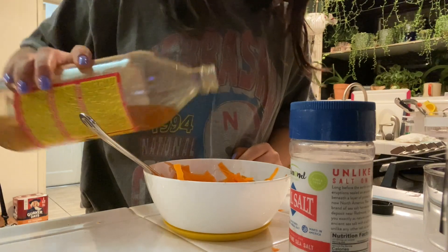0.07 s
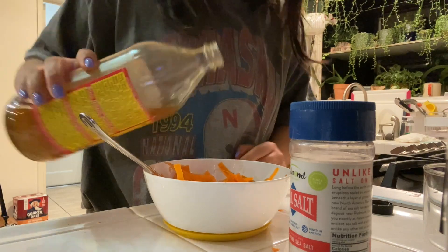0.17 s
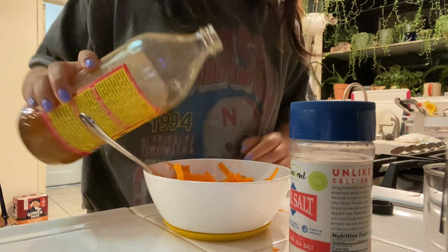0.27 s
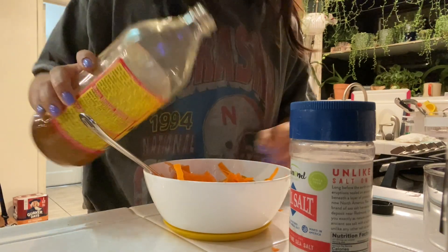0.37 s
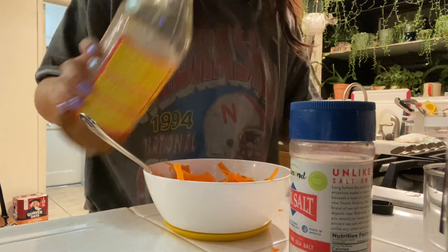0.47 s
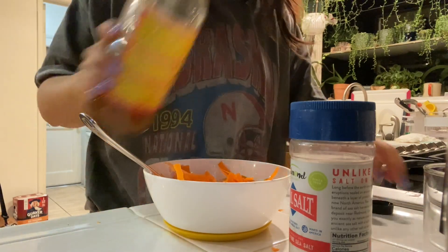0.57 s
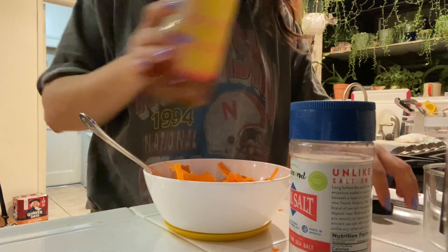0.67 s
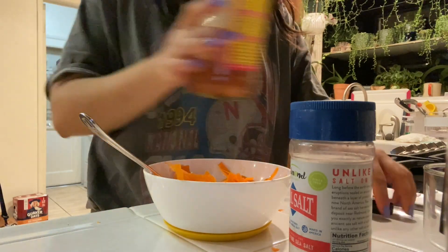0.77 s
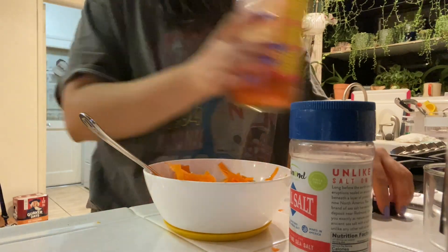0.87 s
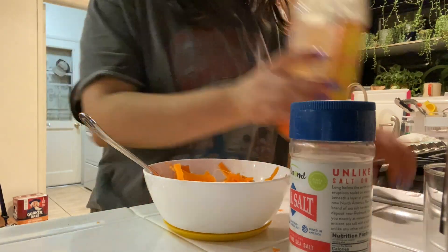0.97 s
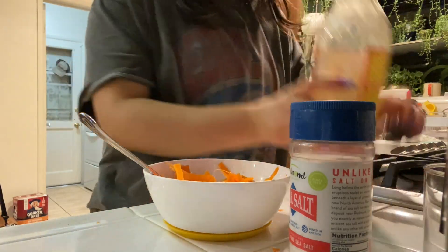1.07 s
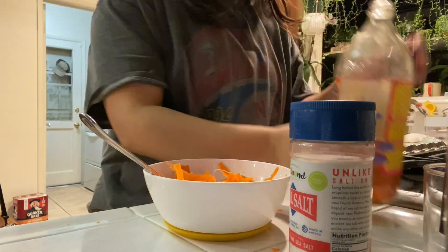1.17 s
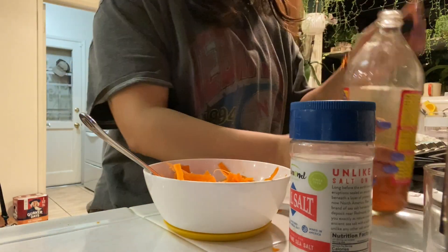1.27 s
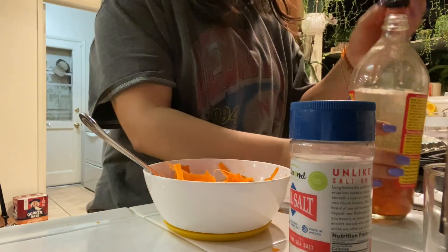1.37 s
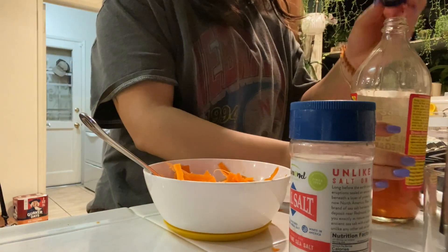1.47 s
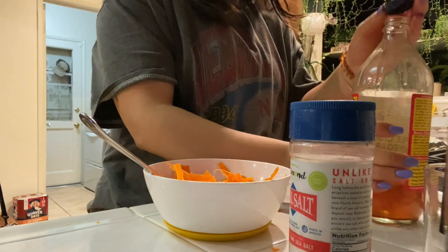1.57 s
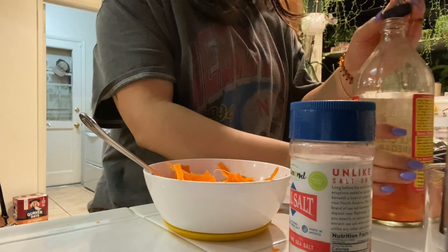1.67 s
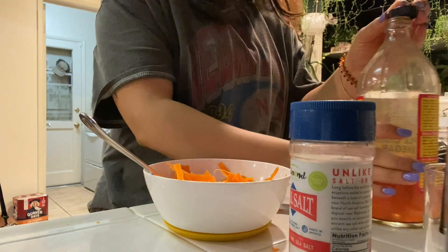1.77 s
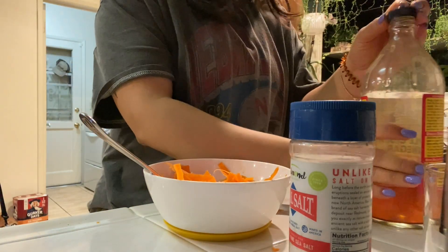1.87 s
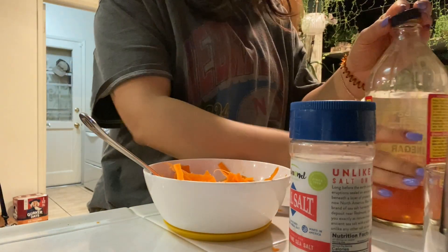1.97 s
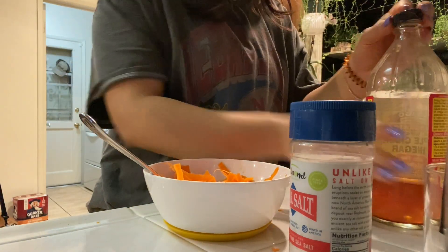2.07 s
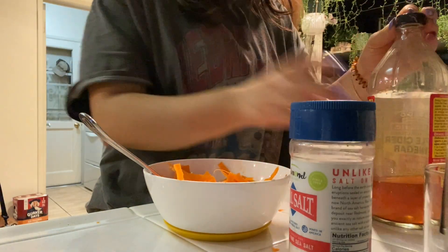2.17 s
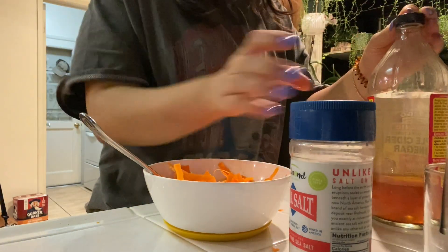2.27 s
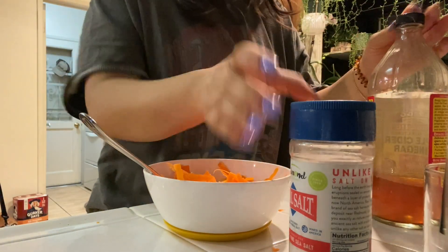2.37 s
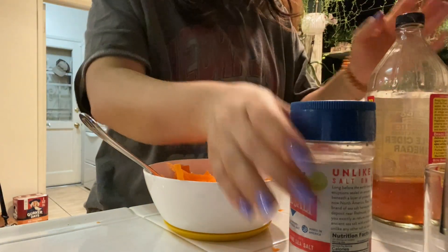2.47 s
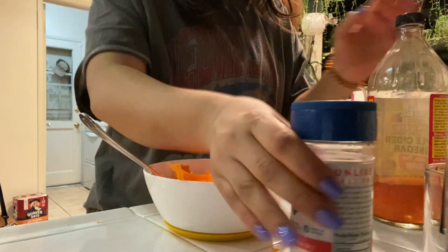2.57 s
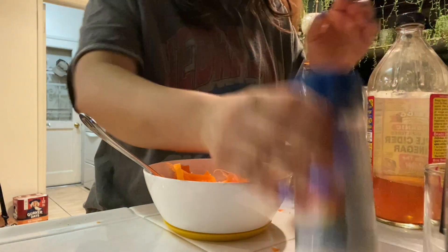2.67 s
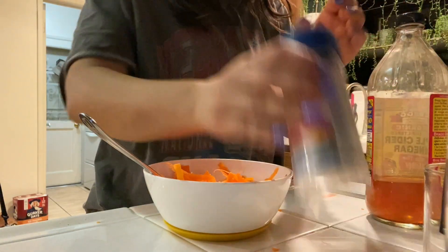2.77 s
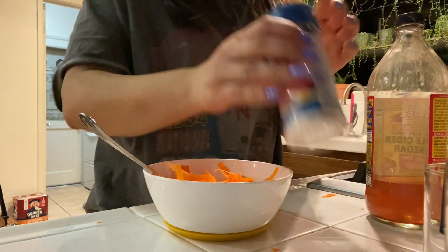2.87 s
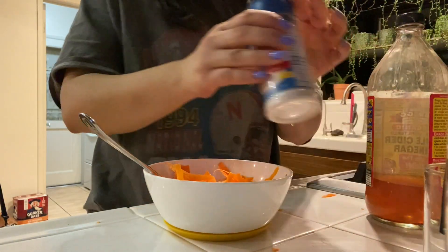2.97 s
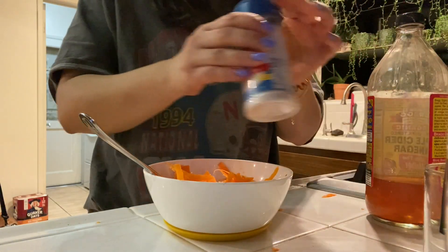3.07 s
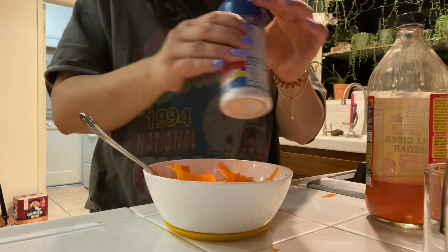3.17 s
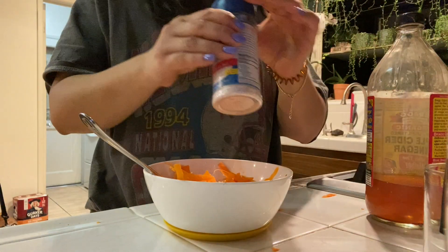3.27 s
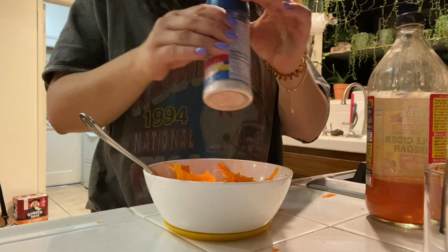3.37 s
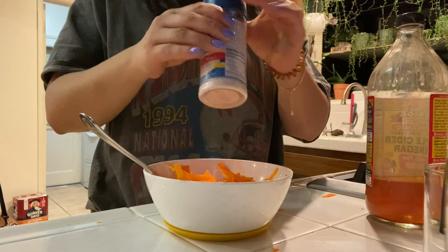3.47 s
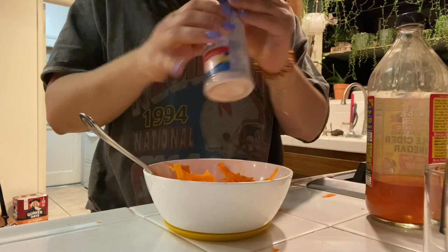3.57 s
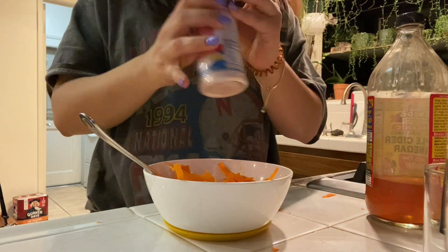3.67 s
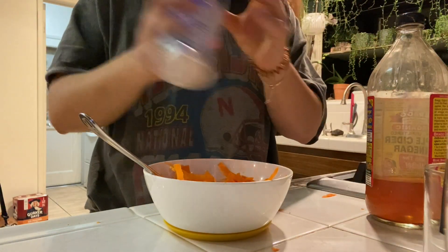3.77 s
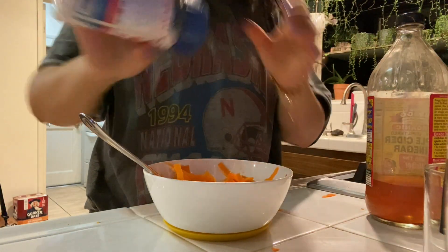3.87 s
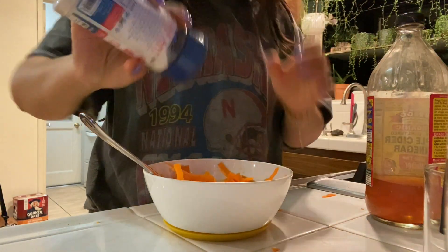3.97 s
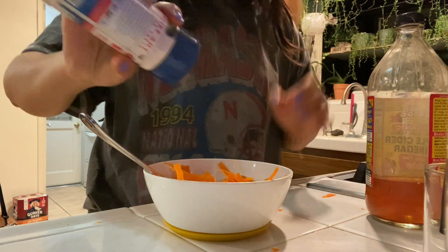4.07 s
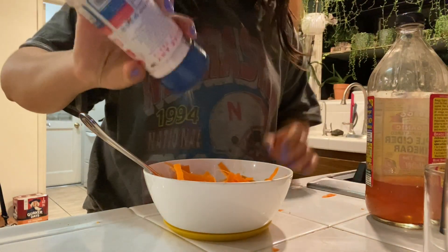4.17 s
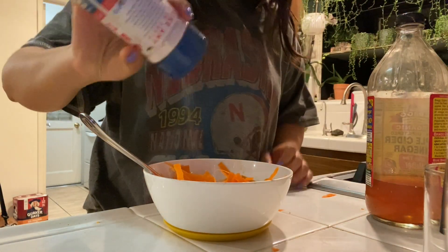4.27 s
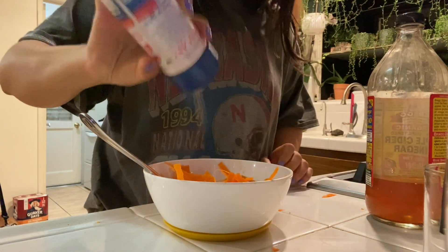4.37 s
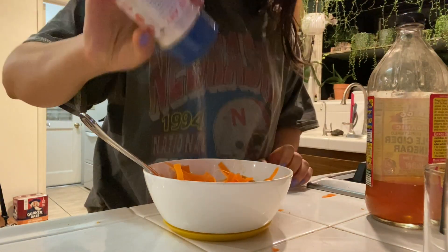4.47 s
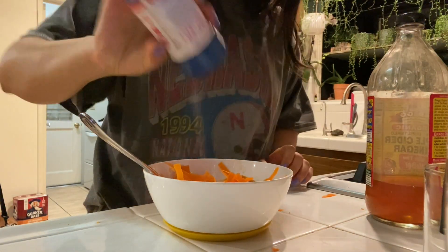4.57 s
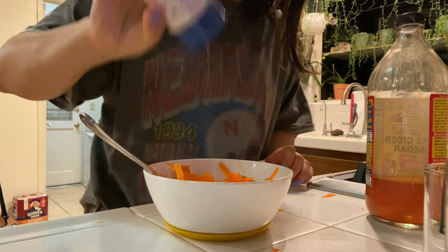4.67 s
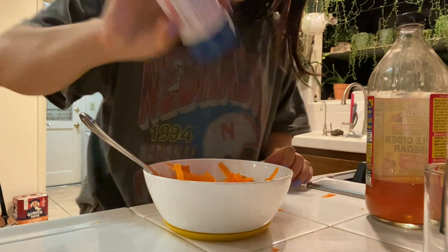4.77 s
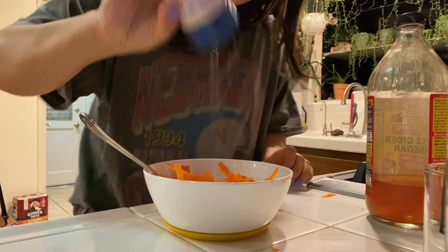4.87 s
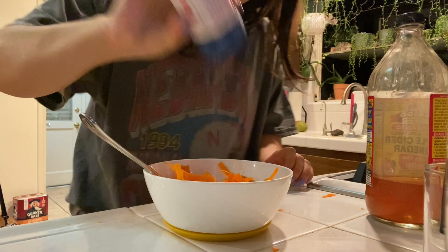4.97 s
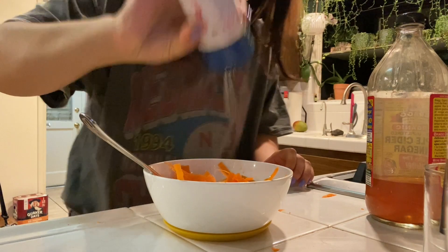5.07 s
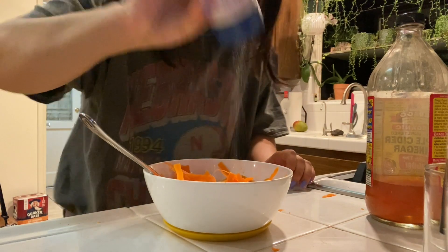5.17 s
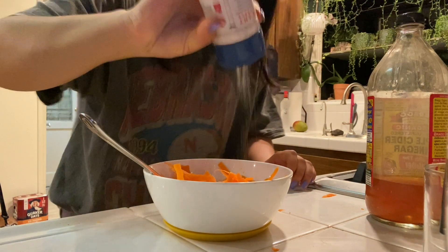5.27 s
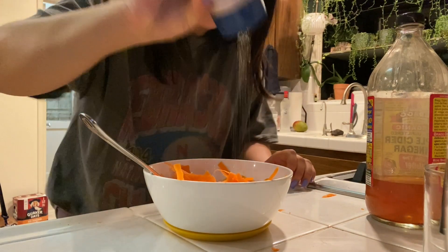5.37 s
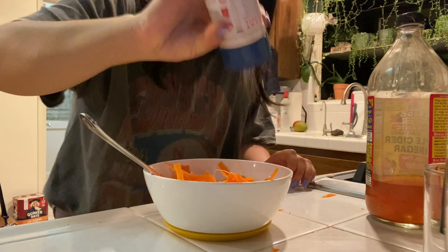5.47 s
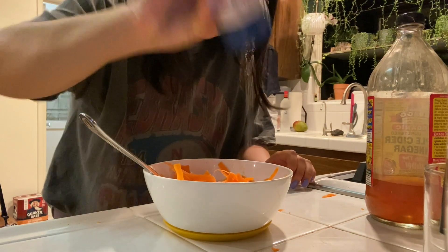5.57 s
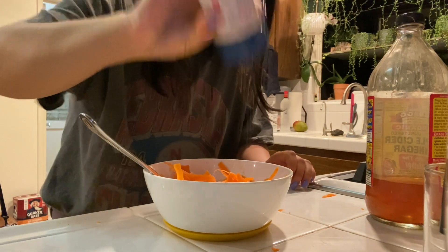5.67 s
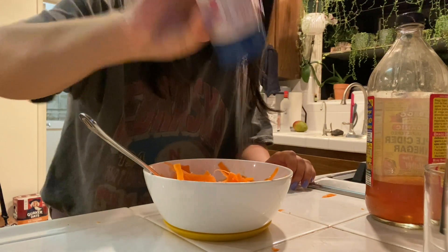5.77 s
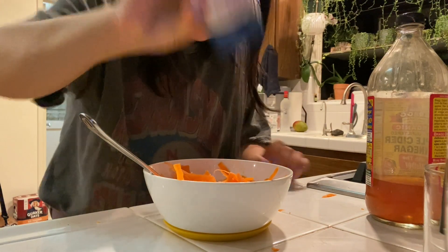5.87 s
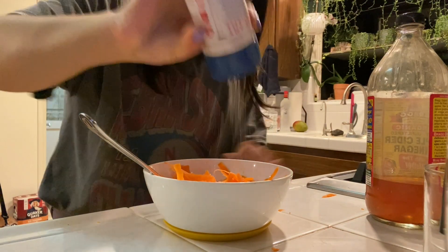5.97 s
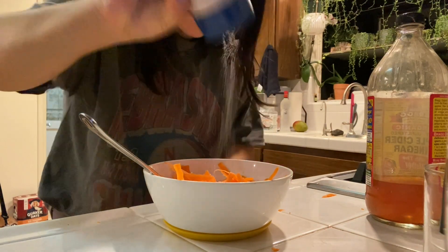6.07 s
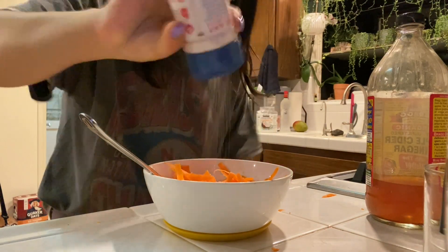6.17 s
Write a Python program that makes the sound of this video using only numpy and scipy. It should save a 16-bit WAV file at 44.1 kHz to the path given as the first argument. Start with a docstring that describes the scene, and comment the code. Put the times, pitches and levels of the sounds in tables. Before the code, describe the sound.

In a small kitchen with a low throbbing fan, tiny bubbles gurgle in a glass bottle and bracelet beads tick on it. The bottle bumps down on a tiled counter in a loud uneven cluster of knocks, and the cap clicks on. A plastic lid snaps open, then salt rattles and hisses in regular shakes, about four per second. Close stereo pickup from the counter.

```python
"""Bottle and salt shaker in a home kitchen

A glass bottle gurgles, a bracelet rattles on it, it is set down on a tiled counter and capped: rising
bubble tones, then noise cracks and pushes that ring the modes of beads, counter, glass and neck.
A plastic salt shaker is picked up, flipped open and shaken over a bowl: ringing snaps, then filtered
sparse grains. Beneath lie a throbbing fan, made of beating shaft orders and coloured noise, and the
echoes of the room. A phone with two microphone ports lies on the counter."""
import sys
import numpy as np
from scipy import signal
from scipy.fft import rfft, irfft
from scipy.io import wavfile
from scipy.ndimage import uniform_filter1d

SR = 44100
rng = np.random.default_rng(int(sys.argv[2]) if len(sys.argv) > 2 else 0)


def master_out(mix):
    """Clip the mix to full scale and print it as 16-bit PCM to the path in sys.argv[1]."""
    frames = np.transpose(np.atleast_2d(mix))
    ceiling = np.clip(frames, -1, 1)
    pcm = np.round(ceiling * 32767).astype(np.int16)
    wavfile.write(sys.argv[1], SR, pcm)


N = 274743  # samples


def gain_of(db):
    """Turns dB into gain."""
    return 10 ** (np.asarray(db) / 20)


def evened(x):
    """Scales to rms 1."""
    return x / np.sqrt(np.mean(x ** 2) + 1e-20)


def coloured(x, points):
    """Shapes the spectrum through (Hz, dB) points, joined on a log frequency axis."""
    f, db = np.transpose(points)
    hz = np.fft.rfftfreq(x.shape[-1], 1 / SR)
    curve_db = np.interp(np.log(hz + 1), np.log(f + 1), db)
    return irfft(rfft(x) * gain_of(curve_db), x.shape[-1])


def patchy(x, depth_db, size):
    """Random patches lift and lower the colour; short frames give brief wide ones, long frames slow narrow ones."""
    z = signal.stft(x, nperseg=size)[2]
    patches = rng.standard_normal(z.shape[1:])
    patches = uniform_filter1d(patches, size=5, axis=0)
    patches = uniform_filter1d(patches, size=8, axis=1)
    return signal.istft(z * gain_of(depth_db * evened(patches)), nperseg=size)[1][:, :N]


def wander(hz, count):
    """Slow random curves of rms about 1, each a sum of twelve sines up to the given rate."""
    t = np.arange(0, N + 512, 256) / SR
    f = hz * rng.uniform(0.067, 1, (count, 12, 1))
    phase = rng.random((count, 12, 1))
    slow = np.sin(2 * np.pi * (f * t + phase)).sum(1) / np.sqrt(6)
    return np.array([np.interp(np.arange(N) / SR, t, row) for row in slow])


def add(mix, s, sound):
    """Mixes a two-port sound in at time s."""
    part = mix[:, round(s * SR):][:, :sound.shape[1]]
    part += sound[:, :part.shape[1]]


def sided(pan_db):
    """Port gains for a left-right level difference."""
    return gain_of([[pan_db / 2], [-pan_db / 2]])


def ring(modes, near_hz, reach, uneven_db=1.1, detune=0, swell_turns=1.7, scatter=1):
    """Decaying sines, weaker by reach dB per octave from the struck pitch; the left port hears them .3 ms later."""
    hz, db, t60 = np.transpose(modes)[:, :, None]
    t = np.arange(SR // 3) / SR - np.array([.0003, 0])[:, None, None]
    uneven, phase, shift = rng.random((3, len(modes), 1))
    hz = hz * (1 + detune * (2 * shift - 1))
    level_db = db + uneven_db * uneven - reach * abs(np.log2(hz / near_hz)) - 60 * t / t60
    onset = np.clip(t * hz / swell_turns, 0, 1)  # counted in cycles, so bass swells later
    tones = np.sin(2 * np.pi * (hz * t + scatter * phase))
    sound = (gain_of(level_db) * tones * onset).sum(1)
    return sound / abs(sound).max()


RING_DB_PER_DOUBLING = 6.0  # each doubling of crack length feeds the ring this much more


def ticks(rows, modes, ring_db, top_db, pan_db=0.0):
    """A crack of noise with a peak of colour on a broad base, and a ring of modes."""
    out, t = np.zeros((2, N)), np.arange(SR // 3) / SR
    for s, db, crack_ms, hz, broad_db in rows:
        doublings = np.log2(crack_ms)
        colour = [(600, broad_db - 16.0), (1400, broad_db - 0.5),
                  (hz / 1.29, broad_db), (hz, 0), (hz * 1.5, broad_db),
                  (16000, broad_db + top_db - 3.8 * doublings)]  # short is bright
        crack = evened(coloured(rng.standard_normal((2, len(t))), sorted(colour)))
        swell_in = np.minimum(3500 * t / crack_ms, 1)  # slower for long scrapes
        crack = crack * np.exp(-1000 * t / crack_ms) * swell_in
        # the hand makes the ring flutter
        grip_db = 5.5 * evened(uniform_filter1d(rng.standard_normal(len(t)), size=300))
        ring_gain = gain_of(ring_db + RING_DB_PER_DOUBLING * doublings + grip_db)
        ringing = ring_gain * ring(modes, hz, reach=17.0, detune=.004)
        add(out, s, gain_of(db) * sided(pan_db) * (crack + ringing))
    return out


def alike(rows, crack_ms, broad_db, softer=0):
    """One breadth for all rows; the crack lengthens by softer ms for each dB a touch is weaker."""
    return [(s, db, crack_ms - softer * db, hz, broad_db) for s, db, hz in rows]


TRAVEL_S, TRAVEL_HZ = 0.00505, 1012  # a quarter of this pitch comes this much later


def travelled(x):
    """Bending waves cross the counter faster when high, so each blow sweeps downwards."""
    hz = np.fft.rfftfreq(N, 1 / SR)
    turns = TRAVEL_S * (2 * np.sqrt(hz * TRAVEL_HZ) - hz)
    turns = np.where(hz < TRAVEL_HZ, turns, TRAVEL_S * TRAVEL_HZ)  # no delay above
    return irfft(rfft(x) * np.exp(-2j * np.pi * turns), N)


# Bottle blows on the counter. Each row: start in seconds, peak level in dB before the bass is shaped,
# level of the gritty crack in dB on top of that, strongest pitch in Hz.
BOTTLE_BLOWS = [(1.4022, -10, -12, 850), (1.4039, -8, -17, 394), (1.485, -14, -17.5, 474),
                (1.5045, -20.5, -29.5, 353), (1.554, -24.5, -25.5, 220), (1.639, -11.5, -5.5, 1200),
                (1.6413, -8.5, -21, 620), (1.6489, -3, -10.5, 760), (1.670, -19, -19, 500),
                (1.677, -21, -17, 497), (1.693, -17, -5, 1080), (1.699, -12.5, -6, 800),
                (1.716, -25.5, -18, 694), (1.733, -35.5, -17.5, 1100), (1.7766, -37.5, -9, 1230),
                (1.804, -31.5, -9.5, 500), (1.843, -23.5, -6, 1310), (1.853, -18, -26, 545),
                (1.865, -23.5, -10, 543), (1.88, -23.5, -22, 495), (2.099, -22.5, -10.5, 294)]
# Modes of the counter. Each row: pitch in Hz, relative level in dB, time to fall 60 dB in seconds.
COUNTER_MODES = [(160, 2, 0.038), (203, -8.5, 0.078), (284, -11.5, 0.08), (372, -5, 0.067), (429, 0, 0.065),
                 (531, 4, 0.045), (613.5, 2.5, 0.055), (709, -1, 0.094), (833, 6.5, 0.038),
                 (1028, 8, 0.022), (1238, -2.5, 0.1), (1400, 10.5, 0.023), (1555, 3, .025),
                 (1945, -7, 0.034), (2204, 7, 0.029)]
# Colour of glass edge grinding on tile. Each row: frequency in Hz, relative level in dB.
GRIT_COLOUR = [(400, -13), (1000, 15.5), (1600, 2.5), (2500, -17.5), (4000, -28.5), (6000, -37),
               (12000, -41.5)]
# Bass the counter carries to the right port. Each row: frequency in Hz, lift on the right in dB,
# which is also the cut on the left.
RIGHT_BASS_LIFT = [(150, 9), (350, 2.5), (700, 2.5), (1100, 0)]
CONTACT_MS, SOFTER_MS_PER_DB = 0.37, 0.1  # a weaker blow stays longer in contact
DAMPED_S, AFTER_RING = 0.0097, 0.67  # decay of the extra first swing; weight of the ring that goes on


def knocks():
    """Each blow is a smooth push into the modes of the counter, brighter when short, with a gritty crack."""
    out, t = np.zeros((2, N)), np.arange(SR // 8) / SR
    for s, db, crack_db, hz in BOTTLE_BLOWS:
        push = np.hanning(round((CONTACT_MS - SOFTER_MS_PER_DB * db) * SR / 1000))
        modes = ring(COUNTER_MODES, hz, reach=5.3, uneven_db=3.5, detune=0.04, swell_turns=0.34, scatter=0.34)
        blow = signal.fftconvolve(modes, push[None], axes=1)
        # the weight of the bottle damps the first swing
        blow *= AFTER_RING + np.exp(-np.arange(blow.shape[1]) / SR / DAMPED_S)
        add(out, s, gain_of(db) * blow / abs(blow).max())
        crack = evened(coloured(rng.standard_normal(len(t)), GRIT_COLOUR))
        crack = crack * np.exp(-t / 0.0046) * np.minimum(t / 0.0011, 1)
        both_ports = np.array([np.roll(crack, 17), crack])  # left is 17 samples late
        add(out, s, gain_of(db + crack_db) * both_ports)
    out = coloured(travelled(out), [(50, -35), (130, 0)])  # the blows carry no deep bass
    left_bass = np.multiply(RIGHT_BASS_LIFT, [1, -1])
    return np.array([coloured(out[0], left_bass), coloured(out[1], RIGHT_BASS_LIFT)])


# Glassy clinks, the one at 1.612 a faint high ring before a blow.
# Each row: start in seconds, level in dB, colour peak in Hz.
GLASSY_CLINKS = [(1.4052, -52.5, 2800), (1.414, -60, 8050), (1.487, -70, 6000), (1.612, -61, 6130),
                 (1.649, -50, 6130), (1.654, -48, 2800), (1.689, -49.5, 3940), (1.7175, -51, 3600),
                 (1.845, -56.5, 3370), (2.0068, -63, 3500), (2.101, -42.5, 6000)]
# Modes of the glass wall. Each row: pitch in Hz, relative level in dB, time to fall 60 dB in seconds.
GLASS_MODES = [(2832, -6, .17), (3420, -13, .12), (6130, 0, .11), (6230, -5, .1), (7970, -3, .2),
               (8160, -6, .08), (12000, -6, .08)]


def clinks():
    """Glassy clinks around the blows: short cracks with a ring of high modes."""
    rows = alike(GLASSY_CLINKS, crack_ms=5.1, broad_db=-8.0)
    return ticks(rows, GLASS_MODES, ring_db=-14.0, top_db=-3.0)


# The cap meets the neck. Each row: start in seconds, level in dB, crack decay in ms, colour peak in Hz,
# level of the broad base in dB against the peak.
CAP_TOUCHES = [(1.8781, -38, 5.1, 7050, -5.5), (2.0905, -35, 5.6, 5500, 11), (2.094, -30, 5.7, 2670, -7.5)]
# Modes of cap and neck. Each row: pitch in Hz, relative level in dB, time to fall 60 dB in seconds.
NECK_MODES = [(2150, -4, .1), (2650, -2, .09), (3100, -2, .12), (3500, -5, .14), (4400, -3, .12),
              (5050, -2, .07), (5400, -3, .18), (5800, -5, .08), (6200, 2, .12), (7330, -4, .07),
              (8500, -8, .08)]


def cap():
    """Short cracks of the cap set it and the neck ringing."""
    return ticks(CAP_TOUCHES, NECK_MODES, ring_db=-27.0, top_db=8.0)


# Bracelet on the bottle. Each row: start in seconds, level in dB, crack decay in ms, colour peak in Hz,
# level of the broad base in dB against the peak.
BRACELET_RATTLES = [(.410, -59, 5.3, 7450, -30), (.5965, -69, 47, 8000, 3), (.757, -54, 8.8, 4600, -8),
                    (.7715, -48, 20, 4570, -12), (.7895, -28.5, 5.1, 5100, -10),
                    (.7984, -32, 11.3, 8400, -13.5), (.8069, -33, 6.5, 5100, -13),
                    (.9158, -49, 3, 4350, -24), (1.0304, -53.5, 45, 7700, 2),
                    (1.1686, -47.5, 3.4, 4330, -22), (1.3647, -60, 2.5, 4200, -22.5)]
# Modes of the beads. Each row: pitch in Hz, relative level in dB, time to fall 60 dB in seconds.
BEAD_MODES = [(4450, -4, .06), (4820, -2, .06), (5050, -4, .07), (6500, -10, .12), (7900, -2, .12),
              (8250, -3, .1), (12200, -1, .12), (12800, 1, .14)]


def bracelet():
    """Beads tick and scrape on the glass and ring high."""
    return ticks(BRACELET_RATTLES, BEAD_MODES, ring_db=-24.0, top_db=17.0)


# Bubbles in the neck. Each row: start in seconds, level in dB, starting pitch in Hz, length in seconds
# by which the fade has reached BUBBLE_FADE_DB.
NECK_BUBBLES = [(0.219, -56, 2010, 0.0083), (0.231, -66, 1850, .02), (0.2847, -54, 5900, 0.0073),
                (0.285, -65, 4660, 0.026), (0.304, -53.5, 2105, 0.034), (0.305, -63, 2520, 0.02),
                (.327, -71, 4650, .01), (0.374, -71, 2850, 0.013), (0.396, -64, 2200, .012),
                (0.405, -73, 5830, 0.0082), (1.078, -58.5, 2380, 0.018)]
BUBBLE_RISE_HZ_PER_S, BUBBLE_FADE_DB = 4500, 9  # the pitch climbs as the bubble nears the surface


def gurgle():
    """Bubbles ring with a rising pitch and a fluttering level, and stop short."""
    out, t = np.zeros((2, N)), np.arange(SR // 5) / SR
    for s, db, hz, length in NECK_BUBBLES:
        port_turns = np.array([[0], [.12]])  # phase lead of the right port in cycles
        turns = hz * t + BUBBLE_RISE_HZ_PER_S * t ** 2 / 2 + rng.random() + port_turns
        flutter = gain_of(2.5 * evened(uniform_filter1d(rng.standard_normal(len(t)), size=150)))
        fade = gain_of(db - BUBBLE_FADE_DB * (t / length) ** 3) * np.minimum(t / .0015, 1)
        add(out, s, fade * np.sin(2 * np.pi * turns) * flutter)
    return out


def grains(per_s, spread_db):
    """Sparse crystals of uneven size and random sign."""
    size = gain_of(spread_db * np.minimum(rng.exponential(1, (2, N)), 5))
    size = size * rng.choice([-1, 1], (2, N))
    return size * (rng.random((2, N)) < per_s / SR)


def swell(t, start, end):
    """A slide fades in over 90 ms and out over 53 ms."""
    return (np.clip((t - start) / 0.09, 0, 1) * np.clip((end - t) / 0.053, 0, 1)) ** 1.28


def landing(since, db, t60):
    """The heap strikes at once and settles."""
    return gain_of(db - 60 * abs(since) / t60) * np.clip(since / .007, 0, 1)


# Shakes: salt slides along the shaker and lands on the lid. Each row: start in seconds, end in seconds,
# slide level in dB, landing level in dB, both before the final lift of hiss and drum.
SALT_STROKES = [(3.474, 3.717, -67.5, -86), (3.718, 3.922, -64.5, -83), (3.938, 4.083, -46.5, -56),
                (4.08, 4.314, -58, -68), (4.265, 4.462, -58, -87), (4.418, 4.666, -55, -64),
                (4.644, 4.877, -52, -54.5), (4.853, 5.094, -50.5, -50.5), (5.095, 5.318, -49.5, -52.5),
                (5.324, 5.568, -48.5, -55), (5.565, 5.802, -48, -60), (5.793, 6.021, -46.5, -51.5),
                (6.037, 6.266, -46, -54)]
# A hand brushes glass and plastic. Each row: start in seconds, end in seconds, level in dB before that lift.
HAND_BRUSHES = [(2.23, 2.48, -73.5), (2.483, 2.553, -57.5), (2.898, 2.99, -66.5)]
# Colour of the crystals' hiss. Each row: frequency in Hz, relative level in dB.
HISS_COLOUR = [(1000, -49), (2000, -9), (4000, -10.5), (6000, -7), (8000, -1), (9500, -2.5), (12000, -4.5),
               (15000, -2)]
# Colour of their drumming on the wall. Each row: frequency in Hz, relative level in dB.
DRUM_COLOUR = [(700, -7.5), (1300, -10), (1650, -9.5), (2000, -14), (2550, -2.5), (3100, -15.5),
               (3900, -10), (5500, -17), (7000, -23), (9000, -77)]
BUILD_DB, WALL_DB = 3, -11.5  # growth late in the slide; the wall's drumming against the slide
LANDS_AT, LANDING_T60_S = 0.47, 0.14  # share of the stroke; time to fall 60 dB
SECOND_LANDING_S, SECOND_LANDING_DB = 0.062, -20  # before the stroke ends; against the slide


def salt():
    """Crystals hiss along the wall and drum on it, and the heap lands on the lid; a hand rubs dully."""
    t = np.arange(N) / SR
    bright, dull = np.zeros((2, N))
    for start, end, db, landing_db in SALT_STROKES:
        held_back = np.clip((end - .05 - t) / 0.075, 0, 1)
        slide = swell(t, start, end) * gain_of(db - BUILD_DB * held_back)
        first = landing(t - start - LANDS_AT * (end - start), landing_db, LANDING_T60_S)
        # the rest of the heap follows
        second = landing(t - end + SECOND_LANDING_S, db + SECOND_LANDING_DB, LANDING_T60_S / 2)
        bright += slide
        dull += slide * gain_of(WALL_DB) + first + second
    for start, end, db in HAND_BRUSHES:
        bright += swell(t, start, end) * gain_of(db - 4.0)
        dull += swell(t, start, end) * gain_of(db)
    uneven = gain_of(1.9 * wander(45.0, count=1))  # the flow comes in clumps
    hiss = evened(coloured(grains(6000, 1.9), HISS_COLOUR))
    drum = evened(coloured(grains(2600, 2.8), DRUM_COLOUR))
    drum_lift = gain_of(3.0 + 2.0 * wander(30.0, count=1))
    flow = uneven * (gain_of(5.0) * bright * hiss + drum_lift * dull * drum)
    return patchy(flow, 2.6, size=256)  # the colour of the salt shifts in patches


# Modes of the plastic shaker, also used by sharp_cracks().
# Each row: pitch in Hz, relative level in dB, time to fall 60 dB in seconds.
SHAKER_MODES = [(1420, 18, 0.016), (2570, -16, 0.017), (3320, -3, 0.005), (4850, 9, 0.018),
                (7900, 6, 0.033)]
# Fingers and lid on the shaker. Each row: start in seconds, level in dB before panning, colour peak in Hz.
LID_SNAPS = [(2.5452, -52.5, 7800), (3.195, -57, 2270), (3.2278, -54.5, 2520), (3.2782, -44, 2600),
             (3.284, -38.5, 2730), (3.3518, -27.5, 2230), (3.361, -46, 2300), (3.382, -49, 2700),
             (3.5447, -54.5, 8050), (3.5745, -44.5, 7840), (3.6111, -58, 7970), (3.661, -57.5, 4100),
             (3.7268, -49, 2510), (3.7417, -54, 2430), (3.879, -53, 2380)]
SNAP_MS, SOFTER_SNAP_MS_PER_DB = -0.93, 0.16  # crack decay extrapolated to 0 dB; a light touch lasts longer


def lid():
    """Fingers and lid snap on the plastic, which rings dry and short, a little to the right."""
    rows = alike(LID_SNAPS, SNAP_MS, broad_db=-12.5, softer=SOFTER_SNAP_MS_PER_DB)
    return ticks(rows, SHAKER_MODES, ring_db=-27.0, top_db=8.0, pan_db=-2.2)


# Short sharp cracks within the salt's rattle. Each row: start in seconds, level in dB, colour peak in Hz.
SHARP_CRACKS = [(4.006, -49, 2900), (4.024, -43, 2000), (4.032, -34.5, 3900), (4.036, -36.5, 2600),
                (4.043, -42, 1700), (4.054, -49, 2700), (4.1498, -46, 2600), (4.2341, -52, 2600),
                (4.916, -59, 2700), (4.99, -50, 1500), (5.023, -42, 6500), (5.2059, -57, 3800),
                (5.2163, -37, 1600), (5.263, -55, 2500), (5.283, -54, 2400), (5.517, -37, 7500),
                (5.6015, -53, 2600), (5.8334, -62, 2600), (5.962, -43, 4000), (6.1023, -36, 8000),
                (6.127, -50, 8000), (6.1901, -37, 8000), (6.2096, -29, 7500)]


def sharp_cracks():
    """Brief cracks stand out of the rattle, with a faint ring."""
    rows = alike(SHARP_CRACKS, crack_ms=2.5, broad_db=-15.5)
    return ticks(rows, SHAKER_MODES, ring_db=-35.0, top_db=7.0)


# Shaft orders of the throb. Each row: multiple of the shaft speed, relative level in dB.
FAN_ORDERS = [(5, -12.5), (6, -8.5), (7, -3.5), (8, -7), (9, -8), (11, -9.5), (12, -9), (19, -15),
              (27, -15.5), (32, -17)]
# Level of the throb over time. Each row: time in seconds, level in dB added to every order.
THROB_LEVEL = [(0, -37), (.2, -37), (.45, -34), (.65, -36.5), (1.0, -39), (1.2, -37), (1.4, -35),
               (2.0, -33), (2.3, -36), (2.6, -38), (3.2, -44.5), (3.8, -42.5), (4.15, -38), (4.4, -40),
               (5.0, -41.5), (5.4, -41), (5.85, -36), (6.23, -39.5)]
# Colour of the rush of air. Each row: frequency in Hz, relative level in dB per Hz.
AIR_COLOUR = [(25, -23.5), (45, -5.5), (75, -6.5), (131, -4), (291, -5), (412, -7.5), (483, -14),
              (598, -13), (967, -26.5), (1520, -36), (1830, -42), (2800, -49), (4920, -57), (8390, -56),
              (14700, -61)]
FAN_HZ, AIR_DB = 19.7, -41.5  # mean shaft speed; mean rms of the rush
HUM_ORDER, HUM_DB = 3, -47  # multiple of the shaft speed; mean rms


def fan():
    """Shaft orders beat into a throb, each wavering, over a low hum and a rush of air."""
    t = np.arange(N) / SR
    turns = FAN_HZ * t + 0.0813 * wander(.8, count=1)
    order, db = np.transpose(FAN_ORDERS)[:, :, None]
    sway_db = 2.8 * wander(2.0, count=len(order))
    slip = .013 * order * wander(1.2, count=len(order))
    lag = np.array([0, .3])[:, None, None]  # cycles: the right port hears each order later
    waves = np.cos(2 * np.pi * (order * turns + slip - lag))
    throb = (gain_of(db + sway_db) * waves).sum(1)
    throb = throb * gain_of(np.interp(t, *np.transpose(THROB_LEVEL)))
    hum = gain_of(HUM_DB + 2.2 * wander(6.6, count=1)) * np.sin(2 * np.pi * HUM_ORDER * turns)
    air = coloured(rng.standard_normal((2, N)), AIR_COLOUR)
    rush = evened(patchy(air, 1.5, size=2048)) * gain_of(AIR_DB + .9 * wander(2.5, count=1))
    return throb + np.sqrt(2) * hum + rush


# Decay of the kitchen. Each row: frequency in Hz, time to fall 60 dB in seconds.
ROOM_DECAY = [(150, 1), (600, 0.4), (2500, 0.42), (8000, 0.33), (14000, 0.15)]


def kitchen(x):
    """Sparse echoes of random sign, each band dying at its own speed."""
    taps = np.zeros((2, SR))
    at = np.arange(160, SR - 20, 20) + rng.integers(0, 20, (2, (SR - 161) // 20))
    np.put_along_axis(taps, at, rng.choice([-1., 1.], at.shape), 1)
    hz, t, z = signal.stft(taps, SR, nperseg=256)
    f, t60 = np.transpose(ROOM_DECAY)
    decay = gain_of(-60 * t / np.interp(hz, f, t60)[:, None])
    tail = signal.istft(z * decay, SR, nperseg=256)[1]
    return signal.fftconvolve(x, tail / np.linalg.norm(tail[0]), axes=1)[:, :N]


def scene():
    """Near sounds with their echoes, over the fan."""
    low, grit, drips = knocks(), salt(), gurgle()
    high = bracelet() + clinks() + cap() + lid() + sharp_cracks()
    sends = gain_of(-10.5) * low + gain_of(-8.5) * high + gain_of(-9.5) * grit + gain_of(-13.0) * drips
    return low + high + grit + drips + kitchen(sends) + fan()


# Colour of the sum of the channels, with a gap near 10 kHz. Each row: frequency in Hz, gain in dB.
SUM_COLOUR = [(9000, 0.5), (9700, -8.5), (10000, -34.5), (11100, -26.5), (11400, -5.5), (13800, -7),
              (14800, -31)]
# Colour of their difference, with gaps near 7 and 13 kHz. Each row: frequency in Hz, gain in dB.
DIFFERENCE_COLOUR = [(40, -32.5), (110, -14.5), (300, -2.5), (560, 6), (900, 1), (1800, -1.5), (4000, 1.5),
                     (6300, 3), (6900, -8), (7600, -38.5), (8300, -15), (9000, -2), (11600, -3),
                     (12500, -35), (13600, -36), (14200, -14.5)]
# Lean between the channels. Each row: frequency in Hz, left-right level difference in dB.
CHANNEL_LEAN = [(60, -2.5), (180, -2), (530, -2.5), (1600, 1), (5000, -.5), (9000, 0)]


def record(dry):
    """Sum and difference of the channels are coloured apart, the sum with a gap near 10 kHz.

    The bass then leans right, peaks are rounded and the top is cut."""
    both = coloured(dry[0] + dry[1], SUM_COLOUR) / 2
    across = coloured(dry[0] - dry[1], DIFFERENCE_COLOUR) / 2
    hz, db = np.transpose(CHANNEL_LEAN)
    left = coloured(both + across, np.transpose([hz, db / 2]))
    right = coloured(both - across, np.transpose([hz, -db / 2]))
    pair = np.array([left, right])
    rounded = pair / (1 + abs(pair) ** 4) ** .25  # soft overload
    edge = signal.firwin(511, 15100, window=("kaiser", 9), fs=SR)  # low-pass, cutoff in Hz
    return signal.oaconvolve(rounded, edge[None], "same")


dry = scene()
out = record(dry)
master_out(out)
```